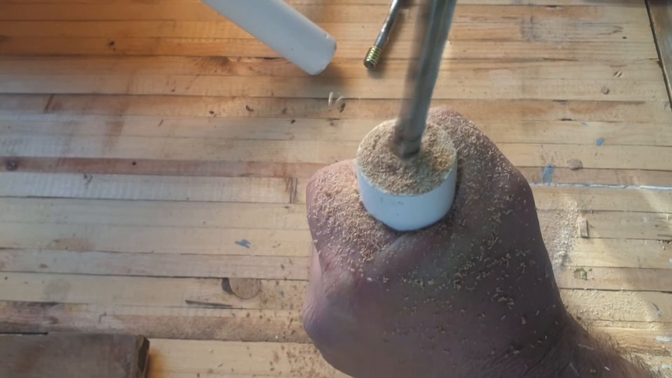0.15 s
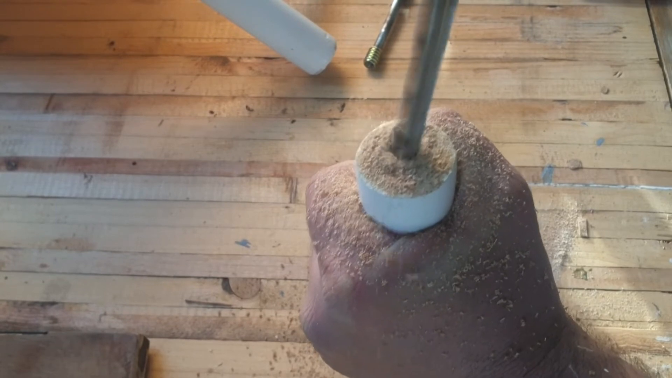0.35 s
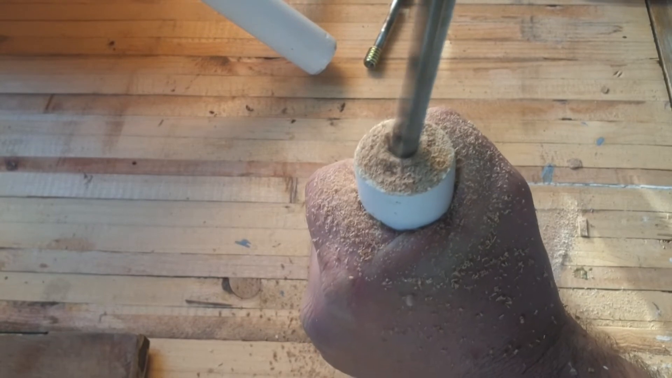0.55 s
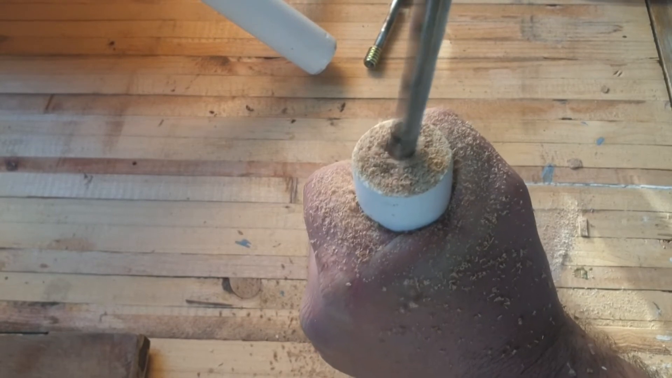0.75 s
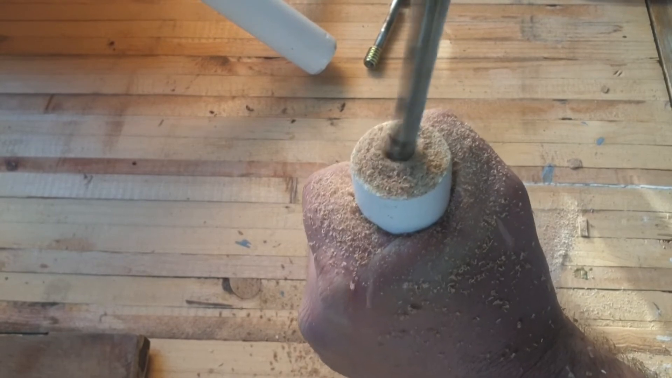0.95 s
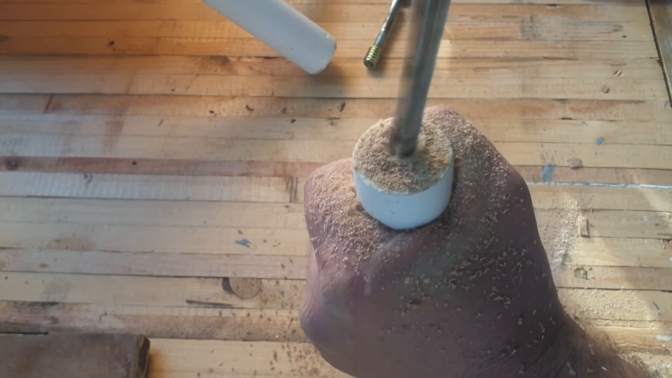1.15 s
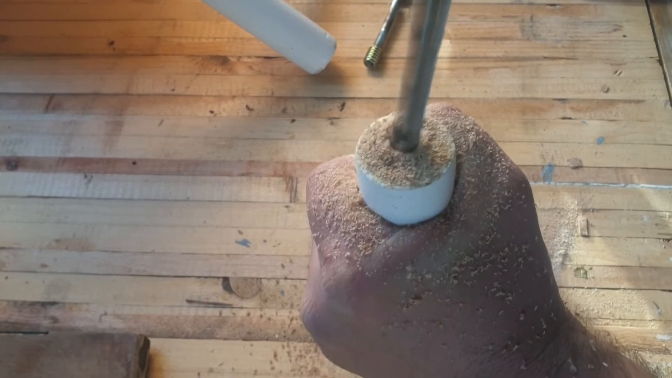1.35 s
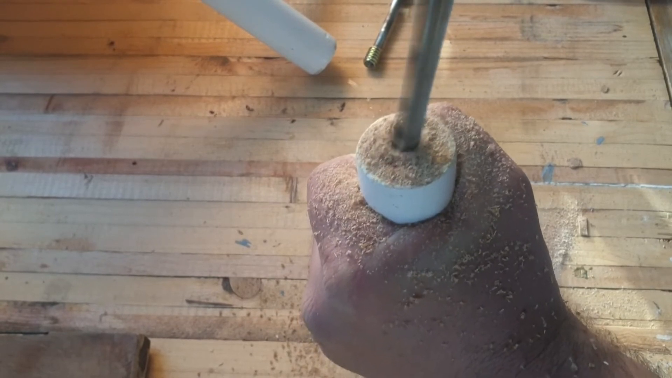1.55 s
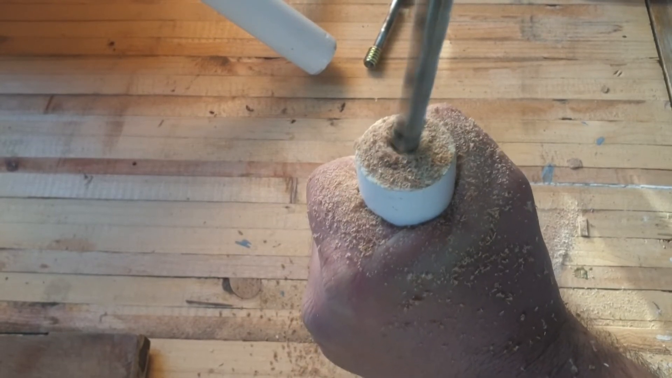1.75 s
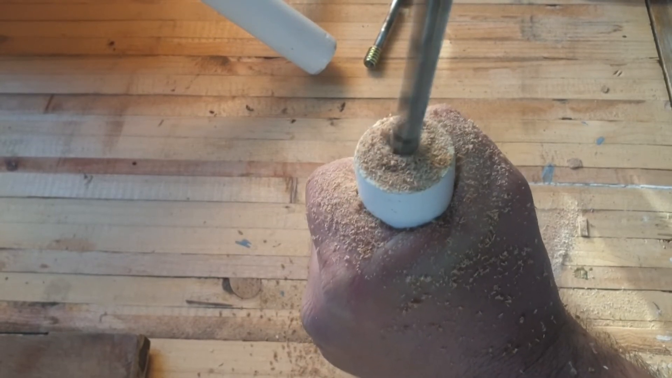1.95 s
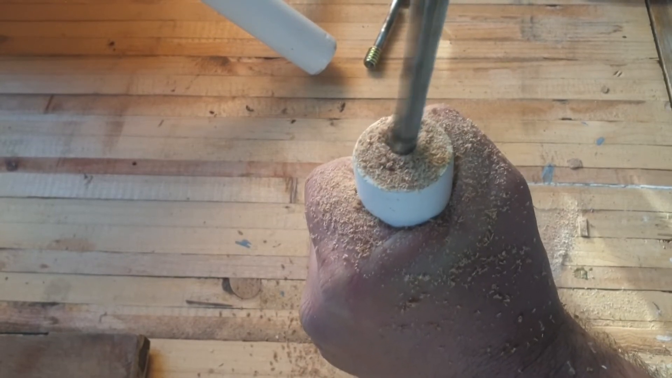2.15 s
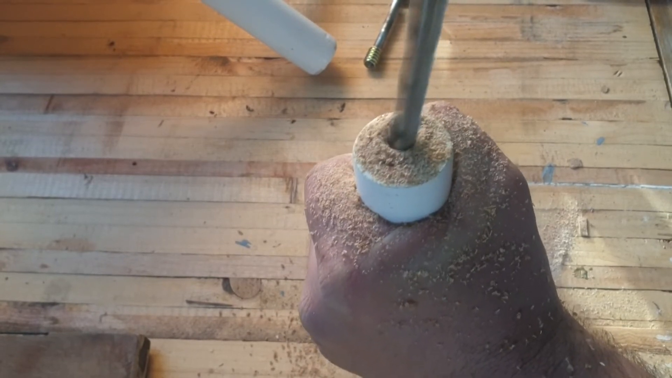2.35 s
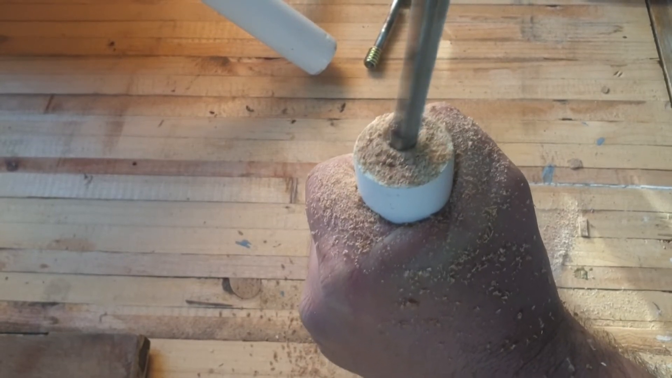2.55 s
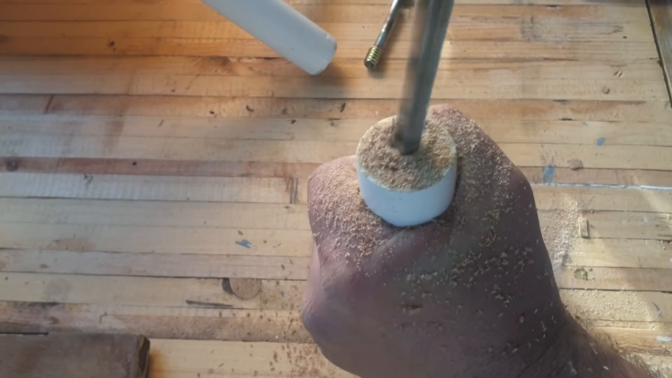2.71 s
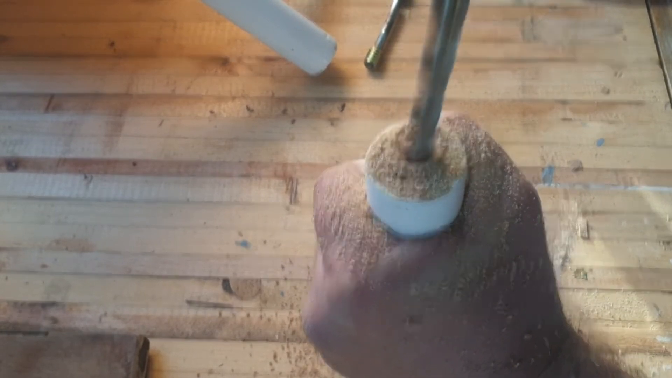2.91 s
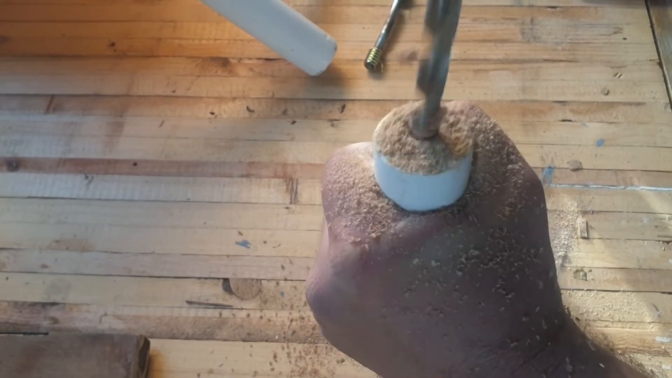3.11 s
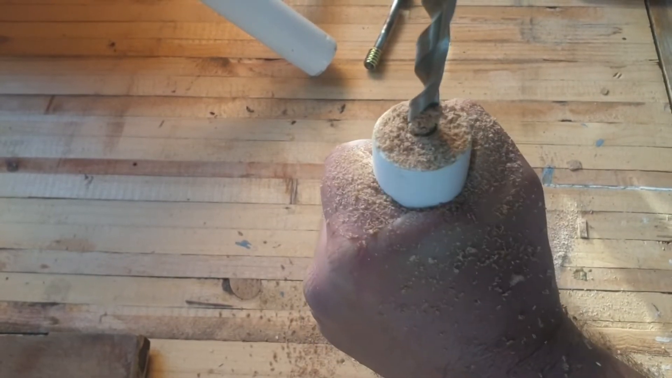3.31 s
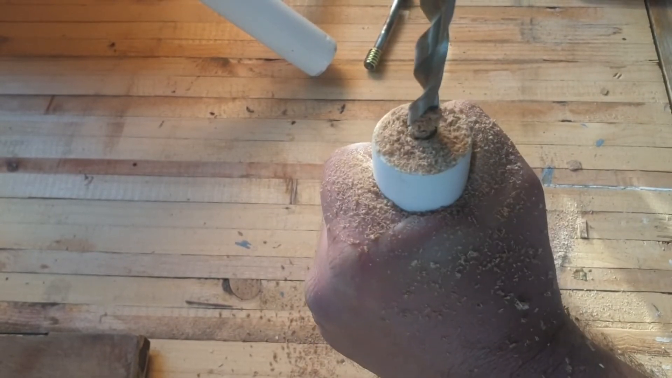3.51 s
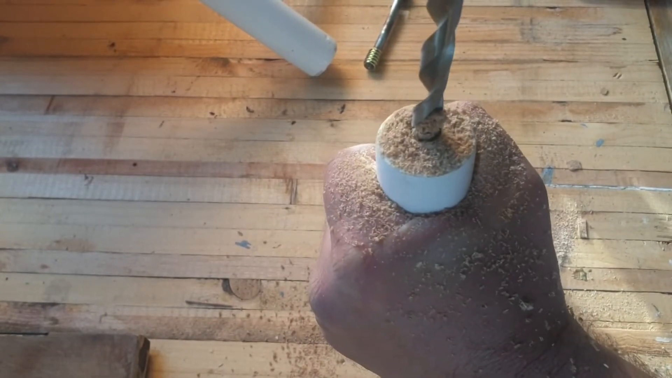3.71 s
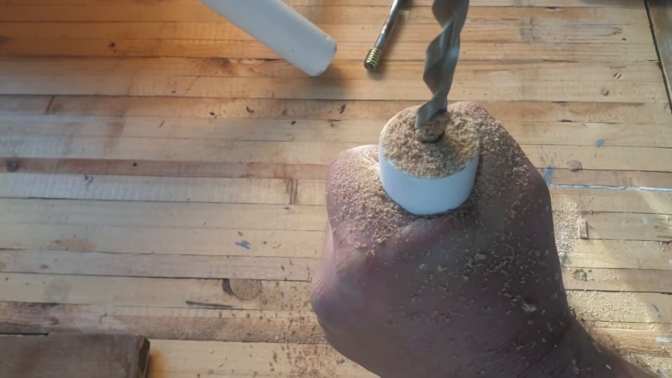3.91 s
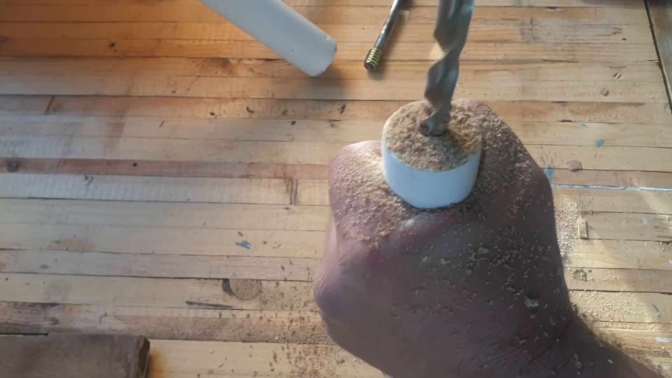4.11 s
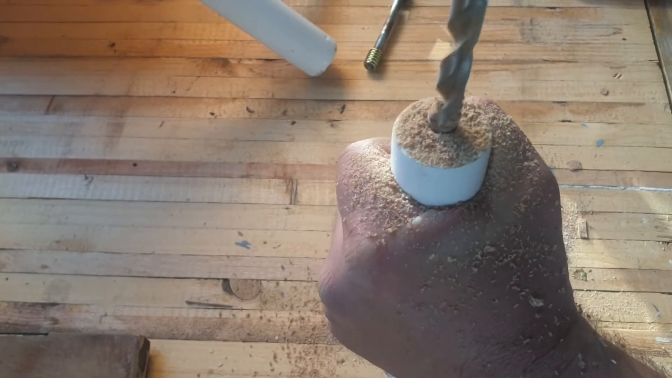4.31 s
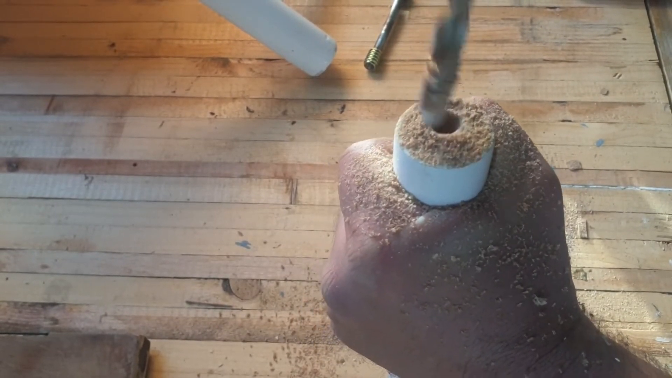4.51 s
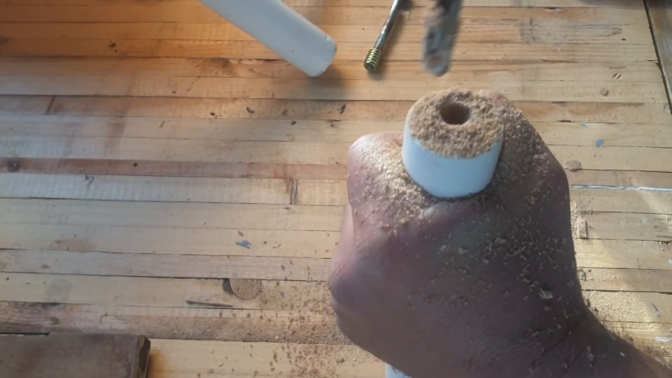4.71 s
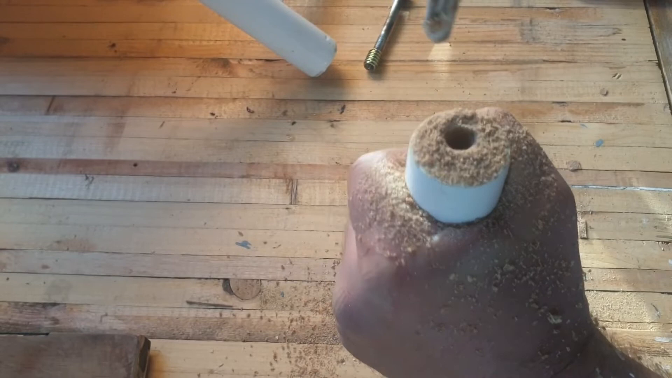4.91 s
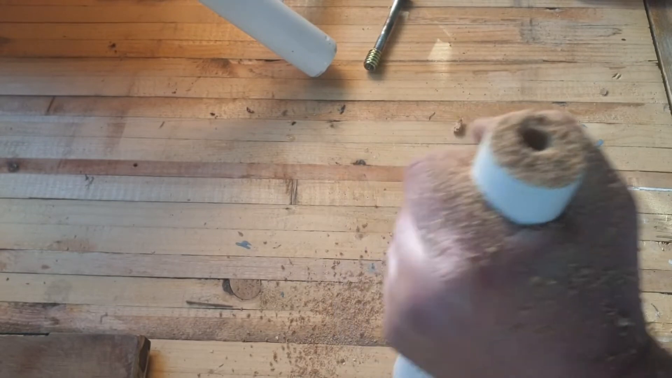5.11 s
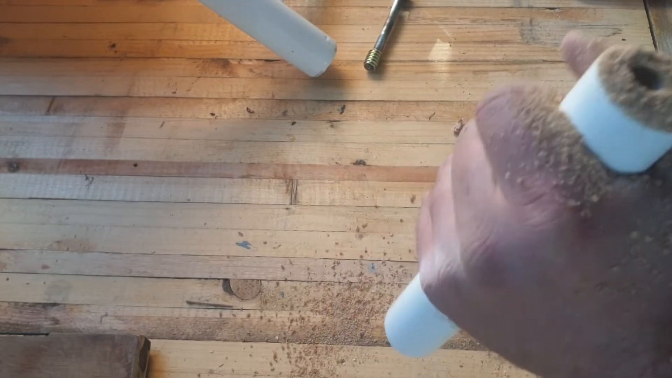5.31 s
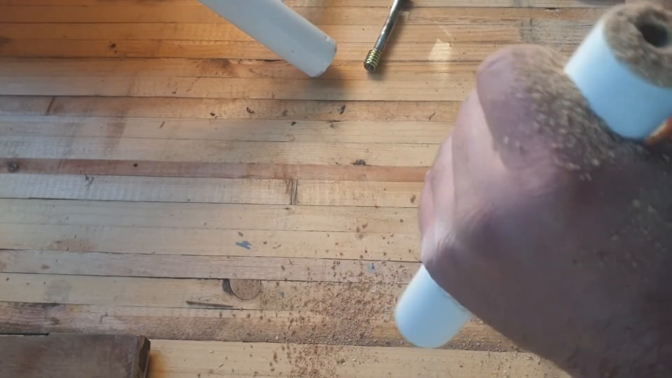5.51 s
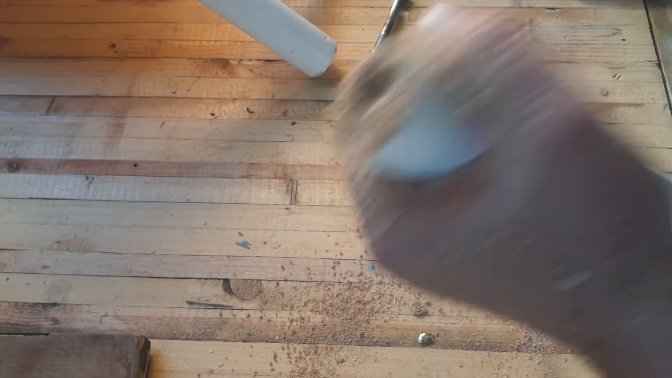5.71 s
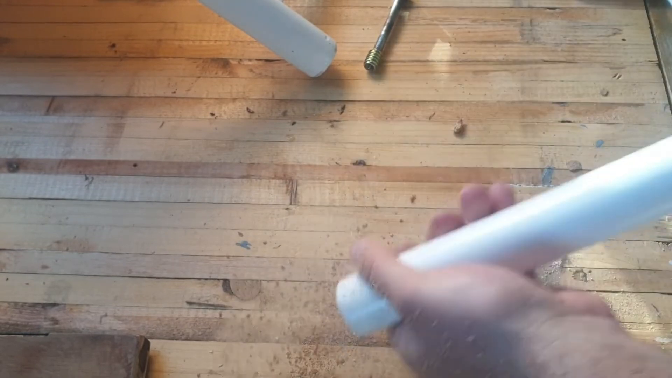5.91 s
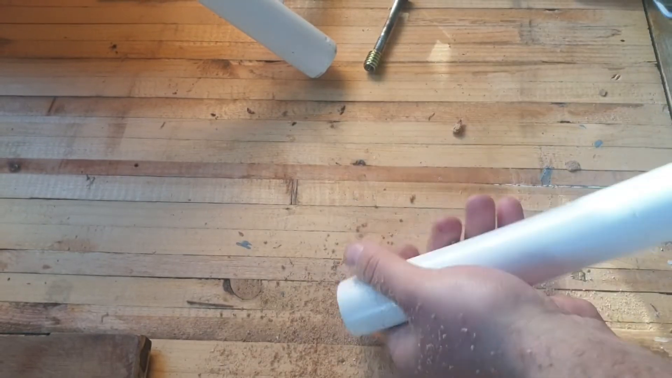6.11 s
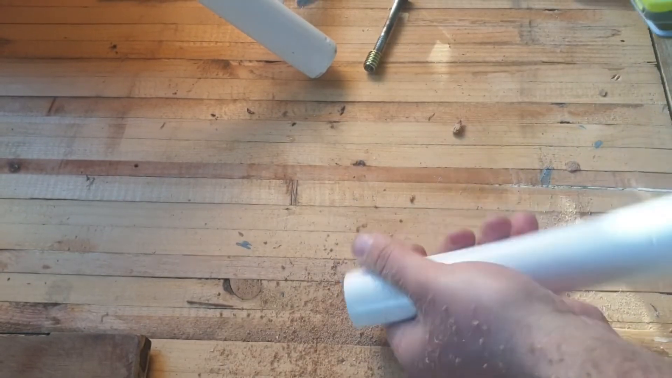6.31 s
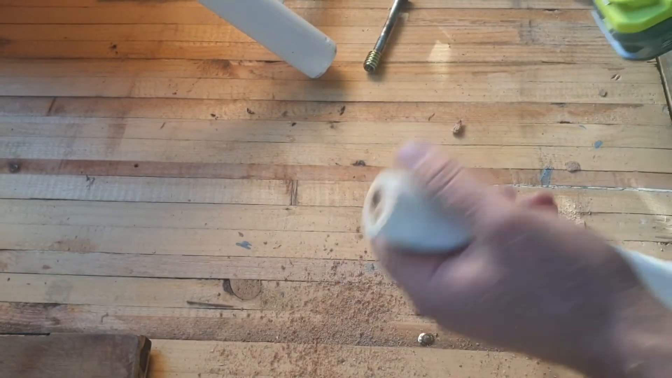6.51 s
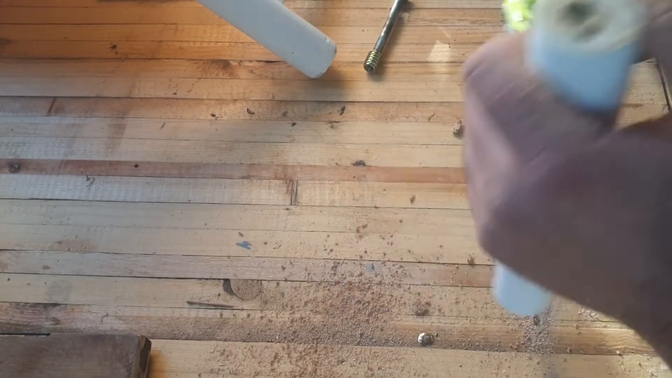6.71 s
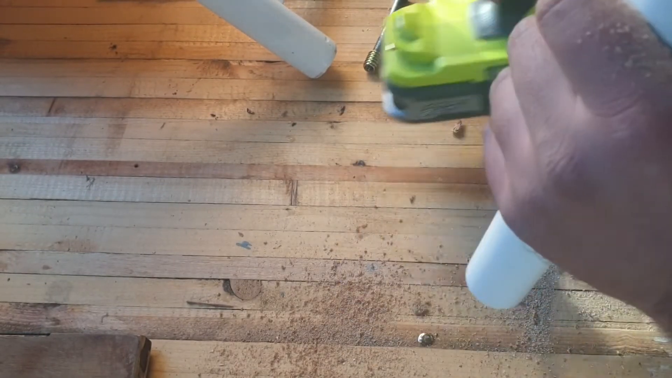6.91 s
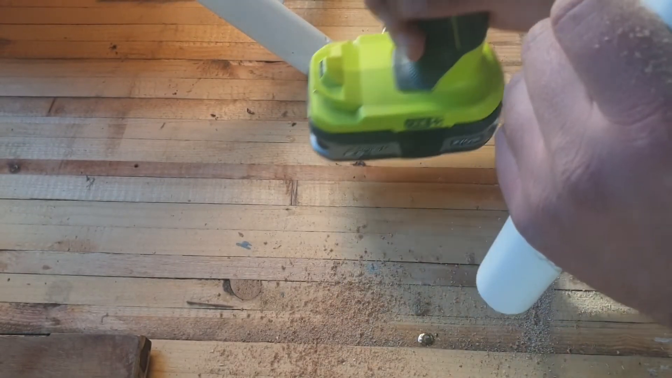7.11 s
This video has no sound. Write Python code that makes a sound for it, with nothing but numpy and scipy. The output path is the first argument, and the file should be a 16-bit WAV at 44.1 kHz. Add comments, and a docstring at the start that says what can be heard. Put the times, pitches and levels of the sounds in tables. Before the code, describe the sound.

From the first moment to about 3.1 s a cordless drill runs close by at full, steady speed: dense, bright gear and brush noise, a motor whine with many overtones, and a low buzzing shake through pipe and bench. Around 2.7-3.0 s the bit is drawn out with lumpy low rattles and a thump, then the drill brakes abruptly. A short near-silence holds a faint tick at 3.6 s. Two quieter half-pulls of the trigger follow, about 3.9-4.1 and 4.3-4.65 s, rough and slow with a thin whistle near 6.7 kHz, clicks at start and stop, the sharpest at 4.64 s. From 5.4 s a palm rubs dry plastic, with a stronger scuff near 5.8-6.0 s. Soft, hollow pipe knocks land on the bench at 6.1 and, weaker, 6.3 s; small scuffs and ticks come at 6.6-6.95 s. A distant engine's low hum and faint hiss grow until the end at about 7.1 s. Small, short-echo workshop.

```python
"""A small workshop: a cordless drill bores into the wooden plug of a hand-held plastic pipe and brakes.
Two half pulls of the trigger follow, then the pipe is knocked on the bench.
The drill is gear noise in casing resonances plus motor and mesh sines; half pulls add a winding whistle.
Ticks and knocks are struck modes, the sliding palm is banded noise, and the bit rattles in low noise.
Outside, a far engine hums as a few sine orders over rumble and hiss."""
import sys
import numpy as np
from scipy import signal
from scipy.fft import rfft, irfft, next_fast_len
from scipy.io import wavfile

SR = 44100
rng = np.random.default_rng(int(sys.argv[2]) if len(sys.argv) > 2 else 0)


def wav_record(signal):
    """Record a signal, one row per channel, as 16-bit PCM in the file named by sys.argv[1]."""
    frames = np.transpose(np.atleast_2d(signal))
    bounded = np.clip(frames, -1, 1)
    # unit amplitude maps onto the largest positive 16-bit level
    quanta = np.round(bounded * 32767).astype(np.int16)
    wavfile.write(sys.argv[1], SR, quanta)


def invert_db(x):
    """Field ratio 10**(x/20) for x, a level in decibels (scalar or array-like)."""
    u = np.asarray(x, float) / 20
    return 10 ** u


N = 315314
SIZE = next_fast_len(N)
TIME = np.arange(N) / SR
HZ = np.fft.rfftfreq(SIZE, 1 / SR) + 1e-3   # just above zero, for the logarithm
FULL_SPEED = TIME < 3.5   # the long run; the half pulls come later
MOTOR_ON = slice(0, round(3.2 * SR))   # span of the motor and spindle sines
SPINDLE_SHARE = .0779   # spindle turns per motor turn
DRILL_PAN_DB, FREED_PAN_DB = 1.0, 1   # long run, half pulls
SAG_S, SAG_DB, COAST_DB_PER_S = 0.036, 5, 25   # after the release a quick sag, then a slow coast
# short half pulls of the trigger: (pull [s], release [s], standstill [s], gear noise [dB], whistle [dB])
PULLS = [(3.879, 4.025, 4.092, -39.5, -31.5), (4.256, 4.424, 4.638, -38, -27.5)]


def rms_one(x):
    """Scale to rms 1."""
    return x / np.sqrt(np.mean(x ** 2) + 1e-20)


def held(rows):
    """Columns of one curve on the sample clock, end values held."""
    s, *columns = np.transpose(rows)
    return [np.interp(TIME, s, c) for c in columns]


def in_time(*tables):
    """Columns of level curves on the sample clock; 4 ms ramps to silence (-150 dB) around each table."""
    rows = []
    for table in tables:
        first, last = table[0], table[-1]
        silence = [-150] * (len(first) - 1)
        rows += [(first[0] - .004, *silence), *table, (last[0] + .004, *silence)]
    return held(rows)


def at_hz(points, column=1):
    """A spectrum table on the FFT grid, interpolated over log frequency."""
    points = np.array(points)
    return np.interp(np.log(HZ), np.log(points[:, 0]), points[:, column])


def drift(rate):
    """Chance wander of spread 1 through rate random knots per second."""
    knots = rng.standard_normal(int(rate * N / SR) + 2)
    return rms_one(np.interp(TIME * rate, np.arange(len(knots)), knots))


def panned(pan_db):
    """Left and right gain; positive leans left."""
    return invert_db(np.array([pan_db / 2, -pan_db / 2]))


def wave(spectrum):
    """Spectrum back to samples."""
    return irfft(spectrum, SIZE)[..., :N]


def stereo_noise(gain, low_hz, high_hz, lead=0):
    """Coloured noise spectra, channel mean at rms 1 in low-high; the shared part may reach the left first."""
    # likeness of the two microphones once the lag is taken out: (frequency [Hz], likeness [0-1])
    likeness = [(60, 0.4), (130, 0.9), (300, 0.6), (700, 0.4), (1500, 0.5), (3000, 0.3), (4000, 0.03),
                (5000, 0.2), (6500, 0.7), (7500, 0.74), (11000, 0.99), (15000, 1)]
    common, left, right = rfft(rng.standard_normal((3, SIZE)))
    alike = np.clip(at_hz(likeness), 0, np.where(HZ > 8300, .62, 1))   # the top stays wide
    late = np.exp(-1j * lead * np.ones_like(HZ))
    shared = np.sqrt(alike) * common * [np.ones_like(late), late]
    pair = gain * (shared + np.sqrt(1 - alike) * np.array([left, right]))
    inside = (HZ > low_hz) & (HZ < high_hz)
    return pair / np.sqrt(2 * np.sum(np.abs(pair.mean(axis=0)[inside]) ** 2)) * SIZE


def pull_envelope(pull_s, release_s, still_s):
    """Gear noise of one half pull, dB below its height: spin up, hold, sag, coast, run out."""
    # after the pull: (time [s], level [dB])
    spin_up = [(0, -29.5), (.024, -17.5), (.045, 0)]
    # after standstill: (time [s], level [dB])
    run_out = [(0.022, -25), (.07, -50.5)]
    end_db = -SAG_DB - COAST_DB_PER_S * (still_s - release_s - SAG_S)
    curve = [(pull_s + s, db) for s, db in spin_up]
    curve += [(release_s, 0), (min(release_s + SAG_S, still_s - .002), -SAG_DB), (still_s, end_db)]
    return curve + [(still_s + s, end_db + db) for s, db in run_out]


def half_pulls():
    """Level curve of both half pulls, dB below the height of each."""
    return in_time(*[pull_envelope(*row[:3]) for row in PULLS])[0]


def gears(motor_phase):
    """Tooth and brush noise in the casing resonances, pulsing at full speed with spindle, edges and motor."""
    # the long run at full speed, braked at its end: (time [s], level [dB])
    run = [(0, -29.5), (.06, -29), (2.9, -29.5), (3.02, -31), (3.092, -33.5), (3.108, -40.5), (3.134, -64),
           (3.23, -93)]
    # colours at full speed, low speed and coasting without current: (frequency [Hz], density [dB per Hz])
    fast_colour = [(260, -51.5), (450, -23), (747, -15.5), (920, -9), (1100, -13), (1440, -9.5),
                   (1620, -12), (1770, -10), (2940, -10), (5430, -7.5), (7100, 3), (8870, -20.5),
                   (12000, -12.5), (14700, -16), (15900, -21)]
    slow_colour = [(260, -37), (450, -24), (805, -19.5), (948, -12), (1340, -8), (1600, -10.5), (1800, -7),
                   (3470, -12.5), (6200, -12), (6890, -4), (8610, -28), (13100, -23.5), (15900, -33)]
    coast_colour = [(240, -47), (400, -32.5), (520, -17.5), (741, -22), (962, -2), (1600, -8), (2700, -4),
                    (3100, -14), (4350, -11), (5000, -14.5), (6800, -1.5), (8840, -26.5), (12800, -17),
                    (15900, -23.5)]
    # casing resonances: (frequency [Hz], width [Hz], height [dB])
    casing = [(1401, 170, 4.5), (1800, 120, 3), (2090, 110, 1), (2633, 120, 4.5), (4430, 90, 4.5),
              (4710, 330, 4.5), (5800, 200, 0.5), (6630, 90, 2), (6610, 120, 0.5), (6982, 170, 3)]
    # phase by which the left port leads: (frequency [Hz], lead [rad])
    port_lead = [(0, -1), (780, 1), (1720, 0.76), (2150, 1), (2840, 3.5), (3530, 3), (4910, 5.5), (5600, 7),
                 (5860, 7.5), (6720, 8.5), (7150, 8), (7410, 8.5), (7670, 5.5), (15600, 7)]
    # pulsing depth [0-1] and level flicker of each zone:
    # (frequency [Hz], per spindle turn, per cutting edge, per motor turn, flicker [dB])
    throbs = [(900, 0.08, 0.081, 0.14, -0.17), (2000, 0.091, 0.081, 0.041, 0.45),
              (5000, .1, 0.084, .03, 0.17), (7000, 0.037, 0.047, .03, 0.5), (9500, 0.12, 0.034, .08, 1),
              (13000, 0.09, 0.05, .08, 1.5)]
    # share of the slowing loss added to each zone, low to high; negative gives some back
    treble_follows = [-.1, 0.13, 0.089, .1, .1, .1]
    loss_limit_db = 14.5
    zone_edges_hz = [0, 1300, 3600, 6200, 8300, 11000, SR]

    first_pull = TIME < PULLS[1][0] - .01
    below_db, run_db = half_pulls(), in_time(run)[0]
    height_db = np.where(first_pull, PULLS[0][3], PULLS[1][3])
    level_db = np.where(FULL_SPEED, run_db, height_db + below_db)
    slowing_db = np.where(FULL_SPEED, run_db - run[2][1], below_db)
    slowing_db = np.clip(slowing_db, -loss_limit_db, 0)

    humps = sum(db / (1 + (2 * (HZ - hz) / width) ** 2) for hz, width, db in casing)
    lead = np.interp(HZ, *np.transpose(port_lead))
    fast = stereo_noise(invert_db(at_hz(fast_colour) + humps), 700, 3500, lead)
    slow = stereo_noise(invert_db(at_hz(slow_colour) + .5 * humps), 700, 4300)
    coast = stereo_noise(invert_db(at_hz(coast_colour)), 700, 4300)
    release_s = np.where(first_pull, PULLS[0][1], PULLS[1][1])
    coasting = np.clip((TIME - release_s) / SAG_S, 0, 1)
    teeth = invert_db(1.6 * drift(180))   # at low speed single teeth roughen the level

    spindle, out = SPINDLE_SHARE * motor_phase, 0
    for k, (_, turn, cut, motor, flicker_db) in enumerate(throbs):
        zone = (HZ >= zone_edges_hz[k]) & (HZ < zone_edges_hz[k + 1])
        throb = 1 + turn * np.cos(spindle + k) + cut * np.cos(2 * spindle) + motor * np.cos(motor_phase)
        unhurried = np.sqrt(1 - coasting) * wave(slow * zone) + np.sqrt(coasting) * wave(coast * zone)
        noise = np.where(FULL_SPEED, throb * wave(fast * zone), teeth * unhurried)
        zone_db = level_db + treble_follows[k] * slowing_db + flicker_db * drift(14)
        out = out + invert_db(zone_db) * noise
    return out * panned(np.where(FULL_SPEED, DRILL_PAN_DB, FREED_PAN_DB))


def motor_whine(motor_phase, level_db):
    """Armature and gear-mesh orders of the motor speed as sines with wandering phase and level."""
    # multiples of the motor speed: armature and gear-mesh orders
    orders = [1, 2, 3, 4, 4.727, 5, 5.565, 6, 8.357, 10.215, 12, 15.03, 16.72, 18.65, 20.43, 25.11]
    # for each order: (level [dB], phase by which the left port leads [rad])
    order_levels = [(-11.5, 1.1), (-11, 0.26), (-1, .3), (-10.5, .5), (-7, 0.88), (-8.5, .8), (-1, 1.1),
                    (-10.5, 1.1), (-9.5, 1.3), (-3.5, 1.2), (-9.5, 1.5), (-7, 0.6), (-3.5, .5), (-8, .9),
                    (0, 1.3), (-6.5, .3)]
    whine, out = 0, np.zeros((2, N))
    for k, (db, lead) in zip(orders, order_levels):
        wander = .6 * np.sqrt(k) * drift(14)[MOTOR_ON]
        phase = k * motor_phase[MOTOR_ON] + wander - np.array([[0], [lead]])
        whine = whine + invert_db(db + 1.8 * drift(20)[MOTOR_ON]) * np.sin(phase)
    out[:, MOTOR_ON] = invert_db(level_db[MOTOR_ON]) * whine
    return np.sqrt(2) * out


def bench_shake(motor_phase, level_db):
    """The off-centre spindle shakes pipe and bench at its orders until the bit leaves the hole."""
    # (spindle order, level [dB])
    spindle_orders = [(2, -10), (3, -26.5), (4, 0), (6, -18.5), (7, -19), (8, -25.5), (10, -15), (12, -17),
                      (14, -16.5)]
    bit_out_s = 2.72
    shake, out = 0, np.zeros((2, N))
    for k, db in spindle_orders:
        phase = k * SPINDLE_SHARE * motor_phase[MOTOR_ON] + k * k + np.array([[.15], [-.15]])
        waver_db = (k != 4) * 2.5 * drift(3)[MOTOR_ON]   # the fourth order stays steady
        shake = shake + invert_db(db + waver_db) * np.sin(phase)
    in_hole = np.clip((bit_out_s + .03 - TIME[MOTOR_ON]) / 0.05, 0, 1)
    out[:, MOTOR_ON] = invert_db(level_db[MOTOR_ON]) * in_hole * shake
    return np.sqrt(2) * out


def rattle():
    """The bit rattles in its hole as lumpy low noise, most while it is drawn out."""
    # rattle during the long run: (time [s], level [dB])
    chatter = [(0, -50), (2.67, -49), (2.706, -44), (2.79, -43.5), (2.886, -39), (3.0, -43.5),
               (3.09, -48.5), (3.13, -60), (3.23, -83.5)]
    # at low speed the pipe colours the rattle: (frequency [Hz], density [dB per Hz])
    slow_colour = [(40, -20), (80, -2), (150, -5), (230, -9), (290, -5.5), (335, 2), (390, -7), (520, -6.5),
                   (700, -29.5)]
    fast_colour = [(35, -23), (70, 4), (150, -2.0), (340, 0.5), (520, -6.0), (700, -37.0)]
    slow_db, follows = -56.5, 0.47   # level at low speed; share of the gear noise's swing
    below_db = half_pulls()
    slow_gain = invert_db(slow_db + follows * below_db) * (below_db > -100)
    fast = invert_db(in_time(chatter)[0]) * wave(stereo_noise(invert_db(at_hz(fast_colour)), 110, 570))
    slow = slow_gain * wave(stereo_noise(invert_db(at_hz(slow_colour)), 110, 451.4))
    return invert_db(2.3 * drift(25)) * (fast + slow)


def whistle():
    """The windings sing at the chopping rate while the trigger is half pulled."""
    # after the pull: (time [s], frequency [Hz], level [dB], octave relative to the tone [dB])
    start = [(0, 6850, -40, -26), (.004, 6840, -12, -33), (.018, 6830, -10, -31), (.021, 6480, -9, -27),
             (.029, 6660, -2, -29), (.045, 6700, 0, -29)]
    mid_hz, end_hz, top_s, cut_s = 6775, 6670, .08, .009
    octave_mid_db, octave_end_db = -26, -36
    notes = []
    for pull_s, release_s, _, _, level_db in PULLS:
        note = [(pull_s + s, hz, level_db + db, octave_db) for s, hz, db, octave_db in start]
        note += [(pull_s + top_s, mid_hz, level_db, octave_mid_db),
                 (release_s, end_hz, level_db - 2.5, octave_end_db),
                 (release_s + cut_s, start[0][1], level_db - 25, octave_mid_db)]
        notes.append(note)
    hz, _, octave_db = held(notes[0] + notes[1])
    db = in_time(*notes)[1]
    phase = 2 * np.pi * np.cumsum(hz + 15 * drift(150)) / SR   # the pitch jitters by 15 Hz
    flutter = invert_db(1.0 * drift(230))
    tone = np.sin(phase + np.array([[.4], [-.4]])) + invert_db(octave_db) * np.sin(2 * phase)
    return np.sqrt(2) * flutter * invert_db(db) * tone * invert_db([[1.5], [-1.5]])


def lurch():
    """The pipe lurches in the fist as the bit is drawn out: low lumpy thumps of noise."""
    # (time [s], level [dB])
    jerks = [(2.7, -60), (2.78, -48), (2.855, -47.5), (2.87, -35), (2.92, -40.5), (3.0, -45), (3.09, -50),
             (3.19, -62.5), (3.22, -81)]
    # (frequency [Hz], density [dB per Hz])
    colour = [(35, -25), (60, -3.5), (85, 1), (130, -6.5), (200, -12), (300, -31.5)]
    return invert_db(in_time(jerks)[0] + 2.5 * drift(30)) * wave(stereo_noise(invert_db(at_hz(colour)), 50, 250))


def ring(clicks, hz, t60):
    """A two-pole resonator: a unit click sets a decaying sine of height 1 ringing."""
    r, w = invert_db(-60 / (t60 * SR)), 2 * np.pi * hz / SR
    return signal.lfilter([0, np.sin(w)], [1, -2 * r * np.cos(w), r * r], clicks + 1e-18)


def blows(events, modes, bright_db, spread_db, offset_db, snap_db, snap_s, soft):
    """Each blow strikes every mode with its own strength and adds a noisy snap; bright ones favour the highs."""
    events, out = np.array(events), np.zeros((2, N))
    at = np.round(events[:, 0] * SR).astype(int)
    chance = rng.normal(0, spread_db, (len(at), len(modes)))
    sides = panned(events[:, -1])
    for k, (hz, db, t60) in enumerate(modes):
        clicks = np.zeros((2, N))
        strength_db = events[:, 1] + db + offset_db + chance[:, k] + (hz > 3500) * bright_db
        sign = -1 if hz < 500 else (-1) ** k
        clicks[:, at] = invert_db(strength_db) * sign * sides
        out[:, at[0]:] += ring(clicks[:, at[0]:], hz, t60)
    for _ in range(2):
        out = signal.lfilter([soft], [1, soft - 1], out)   # a soft contact is dull
    marks = np.zeros((2, N))
    marks[:, at] = invert_db(events[:, 1] + snap_db + bright_db) * sides
    dying = signal.lfilter([1], [1, -invert_db(-60 / (snap_s * SR))], marks + 1e-18)
    dying = signal.lfilter([.03], [1, -.97], dying)   # the contact builds over a millisecond
    snap = (rng.standard_normal(N) + .6 * rng.standard_normal((2, N))) * dying
    band = signal.butter(1, [1200, 8000], "band", fs=SR, output="sos")
    return out + signal.sosfilt(band, snap)


def ticks_and_clicks():
    """Trigger, brake and chuck tick in the drill shell; the last faint ticks come from the handling."""
    # (time [s], strength [dB], brightness [dB], pan [dB])
    events = [(3.643, -51.5, 2, -3), (3.849, -47.5, -3.5, -1), (3.865, -45, 3.5, 3.5),
              (3.89, -30, -5.5, 5.5), (4.092, -41, -3, 3), (4.113, -32.5, -19.5, -5.5),
              (4.195, -55, -18.5, 0.5), (4.213, -38, -10.5, -4), (4.244, -35.5, -4.5, 6.5),
              (4.262, -40.5, -7, 2.5), (4.638, -27, 1.5, 0.5), (4.641, -27.5, 3, 1.5), (4.678, -43.5, 8, 0),
              (4.687, -49, -6.5, 4), (5.595, -45.5, 3.5, -12), (5.811, -48.5, -15, -6),
              (6.638, -49, -13, -2), (6.735, -53, -8, -4.5)]
    # short-ringing modes: (frequency [Hz], level [dB], t60 [s])
    shell = [(900, -6, .02), (1400, -2, .018), (2100, -7, .007), (2800, -6, .006), (4050, -5, .004),
             (5300, -5, .003), (6740, -2, .004), (7600, -4, .003)]
    return blows(events, shell, bright_db=np.array(events)[:, 2], spread_db=3.8, offset_db=-13.0,
                 snap_db=-4.5, snap_s=.016, soft=0.79)


def pipe_knocks():
    """The pipe is set on the bench: softly struck pipe modes."""
    # (time [s], strength [dB], pan [dB])
    events = [(6.076, -25.5, -4.5), (6.286, -29.5, -3)]
    # pipe modes: (frequency [Hz], level [dB], t60 [s])
    pipe = [(95, -3.5, .1), (139, -1.5, 0.11), (200, -7, 0.079), (322, 3, 0.068), (355, -4, .12),
            (432, -3, 0.088), (520, -15.5, 0.055), (583, -11, .09), (676, -8, 0.066), (806, -13.5, .08),
            (885, -0.5, 0.052), (920, -8, .045), (1050, -13, 0.055), (2200, -17, .06), (2820, -18.5, .12),
            (3850, -16.5, .1)]
    return blows(events, pipe, bright_db=0, spread_db=3.2, offset_db=-6.5,
                 snap_db=-38.0, snap_s=.2, soft=0.09)


def slide():
    """Skin drags over dusty plastic: fine noise in a few broad bands, one of them moving with the grip."""
    # palm strokes: (firm from [s], firm until [s], level [dB], band centre [Hz], brightness [dB], pan [dB])
    strokes = [(5.352, 6.251, -85, 3740, 8, -10), (5.8, 5.972, -64.5, 3840, -1, -9),
               (6.696, 6.96, -72, 3460, -2.5, -12)]
    # the grip slips at once and settles: (time [s], level [dB], band centre [Hz], brightness [dB], pan [dB])
    scuffs = [(5.594, -74, 3300, 5, -12), (6.084, -66.5, 3250, 2.5, 2), (6.288, -78, 3000, 5, 9),
              (6.635, -68, 2790, -6, -10)]
    # steady bands: (frequency [Hz], width [Hz], level [dB])
    rub = [(456, 300, 6), (1340, 880, -9), (2070, 300, -11), (3950, 690, 0.5), (7000, 1400, -3.5),
           (11000, 5000, -21)]
    stroke_slopes, scuff_slopes = (120, 131.5), (2000.5, 249)   # rise and fall, dB per s
    swell_db = 6.5   # a stroke is this much softer at its ends than in its middle
    faint_db, faint_dull_db, dull_lag = -94, 7, 0.29   # firm rubbing loses lows: dB per dB above faint

    moves = [(*row, *stroke_slopes) for row in strokes]
    moves += [(row[0], *row, *scuff_slopes) for row in scuffs]
    start, end, top_db, *colours, rise, fall = np.transpose(moves)[..., None]
    loss_db = np.maximum(rise * (start - TIME), fall * (TIME - end))
    off_middle = np.clip((2 * TIME - start - end) / (end - start + 1e-3), -1, 1)
    top_db = top_db - swell_db * off_middle ** 2
    power = invert_db(2 * (top_db - np.clip(loss_db, 0, 120)))
    total = power.sum(axis=0)
    db = 10 * np.log10(total)
    # the moves' colours blend, each weighted by its power
    centre_hz, bright_db, pan_db = [(power * colour).sum(axis=0) / total for colour in colours]
    dull_db = faint_dull_db - dull_lag * np.maximum(db - faint_db, 0)

    colour = sum(invert_db(level_db) / (1 + (2 * (HZ - hz) / width) ** 2) for hz, width, level_db in rub)
    bands = stereo_noise(colour, 2600, 4800)
    dull, bright = HZ < 2500, HZ > 5300
    steady = invert_db(dull_db) * wave(bands * dull) + wave(bands * ~(dull | bright))
    steady = steady + invert_db(bright_db) * wave(bands * bright)
    wobble = signal.lfilter([1], [1, -.9], rng.standard_normal((2, N)))
    wobble = signal.lfilter([1], [1, -.95], wobble)
    moving = rms_one(wobble * np.sin(2 * np.pi * np.cumsum(centre_hz) / SR))   # noise around the centre
    return invert_db(db + 1.4 * drift(40)) * panned(pan_db) * (.45 * steady + 0.77 * moving)


def workshop(x):
    """Room: dense reflections that die away, other ones at each ear."""
    t60_s, level_db = 0.23, -6.5
    t = TIME[:SR // 2]
    tail = rng.standard_normal((2, len(t))) * invert_db(-60 * t / t60_s) * (t > .004)
    tail /= np.sqrt(np.sum(tail ** 2, axis=1, keepdims=True))
    return invert_db(level_db) * signal.fftconvolve(x, tail, axes=1)[:, :N]


def background():
    """A far engine as four sine orders of its firing rate over outdoor rumble, and a faint hiss."""
    # engine: (time [s], firing rate [Hz], first order [dB], third order [dB], even orders [dB])
    engine = [(3.2, 53, -75, -84, -79.5), (3.36, 53.2, -60, -87, -90), (3.79, 53.3, -64, -71, -74.5),
              (4.55, 54.6, -57, -73.5, -79), (4.66, 54.9, -48.5, -62, -75), (4.78, 54.6, -53.5, -74.5, -79),
              (5.13, 54.7, -52.5, -73.5, -76.5), (5.7, 54.64, -42.5, -60, -66.5),
              (5.92, 54.88, -44.5, -61, -67), (6.06, 56.12, -47, -61.5, -66),
              (6.26, 55.4, -51.5, -58, -65.5), (6.42, 55.73, -38.5, -62.5, -67.5),
              (7.03, 56.3, -34.5, -67, -51.5), (7.13, 55.2, -32, -67, -55.5)]
    # (time [s], rumble level [dB])
    air = [(3.2, -70), (3.8, -67), (4.7, -65.5), (5.22, -64), (5.73, -54), (5.95, -52), (6.3, -57.5),
           (7.15, -54.5)]
    # (time [s], hiss level [dB])
    hiss_rise = [(3.2, -99), (4.9, -94), (5.5, -89), (6.4, -88.5), (7.15, -86)]
    # colours: (frequency [Hz], density [dB per Hz])
    rumble_colour = [(15, -35), (25, -11), (48, -7.5), (70, -4.5), (123, -23.5), (220, -22), (280, -28),
                     (350, -26), (519, -39.5), (1500, -58), (1950, -89), (3300, -120)]
    hiss_colour = [(590, -28), (1000, -3.5), (1740, -5), (2000, -8.5), (2220, -1.5), (4450, -6.5),
                   (7230, -7), (8300, -12.5), (11200, -6), (15900, -5.5)]
    waver_db, overtone_waver_db, second_order_db = 2, 4.0, -2.5
    hz, first_db, third_db, even_db = held(engine)
    levels = [first_db + waver_db * drift(10)]
    for db in (even_db + second_order_db, third_db, even_db):
        levels.append(db + overtone_waver_db * drift(10))
    phase = 2 * np.pi * np.cumsum(hz) / SR + np.array([[.2], [-.2]])
    hum = sum(invert_db(db) * np.sqrt(2) * np.sin((k + 1) * phase + k) for k, db in enumerate(levels))
    rumble = wave(stereo_noise(invert_db(at_hz(rumble_colour)), 70, 600))
    hiss = wave(stereo_noise(invert_db(at_hz(hiss_colour)), 8500, 15000))
    outdoors = invert_db(held(air)[0] + 1.1 * drift(9.2)) * rumble
    return hum * invert_db([[-.9], [.9]]) + outdoors + invert_db(held(hiss_rise)[0]) * hiss


def scene():
    """Drill, pipe and hand over the background; ticks, knocks and whistle also excite the room."""
    # (time [s], motor speed [turns per s])
    speed = [(0, 310.3), (1.0, 310.5), (2.7, 310.9), (2.97, 311.5), (3.12, 270)]
    # (time [s], motor whine [dB], bench shake [dB])
    load = [(0.0, -44.5, -42), (0.45, -40, -40), (0.71, -39.5, -41.5), (0.94, -45, -38.5),
            (1.24, -43.5, -42.5), (2.12, -40.5, -44.5), (2.46, -40.5, -42), (2.8, -48.5, -42.5),
            (2.99, -56.5, -42), (3.14, -84, -42)]
    motor_phase = 2 * np.pi * np.cumsum(held(speed)[0]) / SR
    whine_db, shake_db = in_time(load)
    drill = gears(motor_phase) + motor_whine(motor_phase, whine_db) + bench_shake(motor_phase, shake_db)
    ticks, knocks, chop = ticks_and_clicks(), pipe_knocks(), whistle()
    room = workshop(invert_db(-5.0) * ticks + invert_db(1) * knocks + .12 * chop)
    pipe = rattle() + lurch() + slide()
    return drill + pipe + ticks + knocks + chop + room + background()


def low_pass(x):
    """Removes everything above the highest recorded frequency."""
    return signal.sosfilt(signal.butter(12, 16020, fs=SR, output="sos"), x)


def record(dry):
    """The small microphones lose the deepest bass; a 6 ms fade ends the sound."""
    bass_cut = signal.butter(2, 38, "high", fs=SR, output="sos")
    fade = np.clip((N / SR - TIME) / .006, 0, 1) ** 2
    mix = signal.sosfilt(bass_cut, dry) * fade
    return low_pass(mix)


dry = scene()
out = record(dry)
wav_record(out)
```